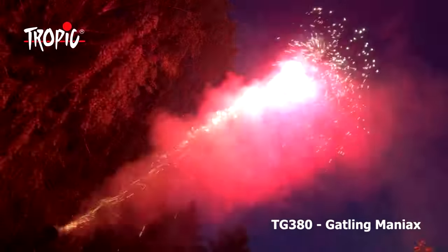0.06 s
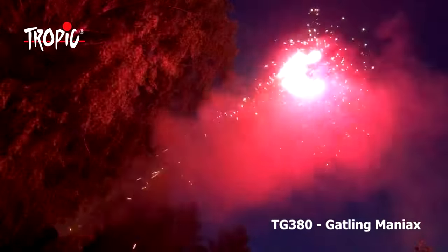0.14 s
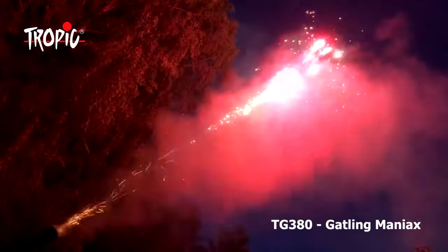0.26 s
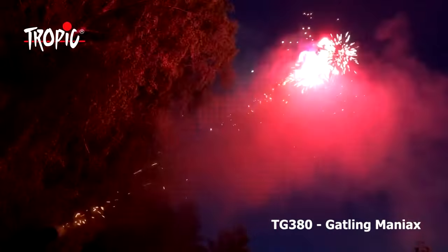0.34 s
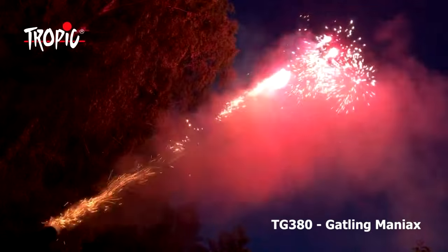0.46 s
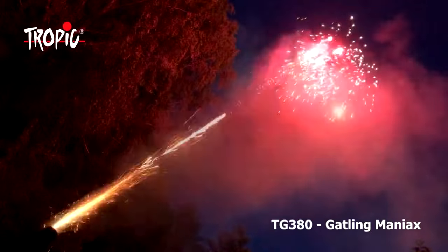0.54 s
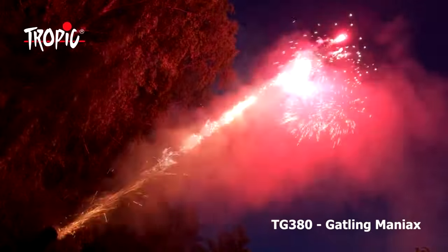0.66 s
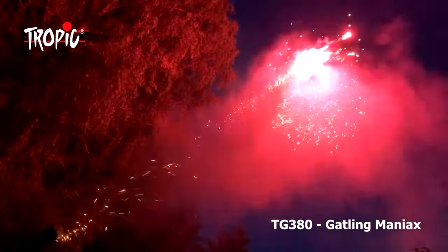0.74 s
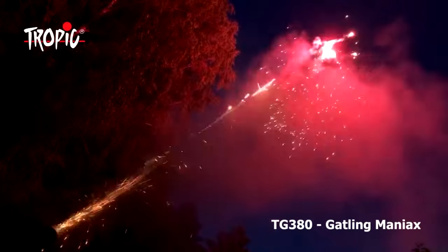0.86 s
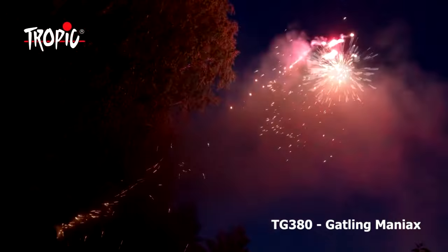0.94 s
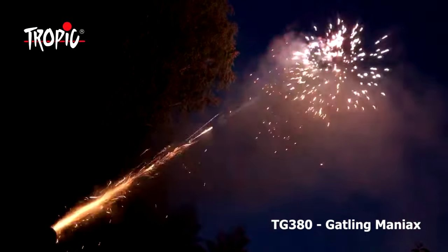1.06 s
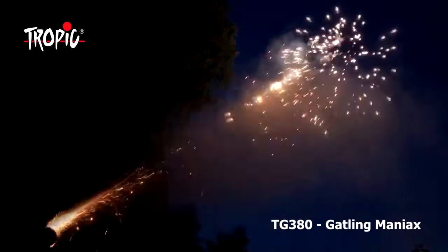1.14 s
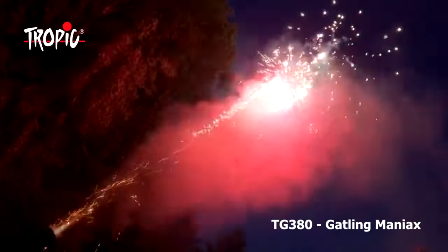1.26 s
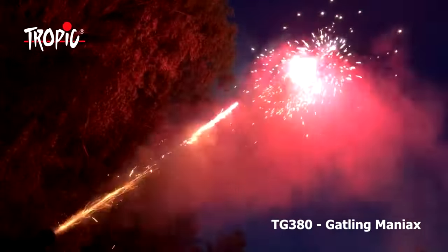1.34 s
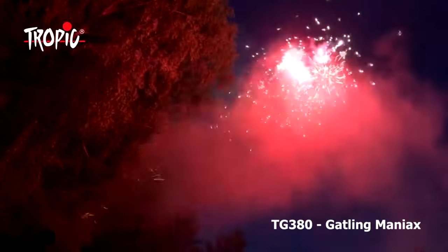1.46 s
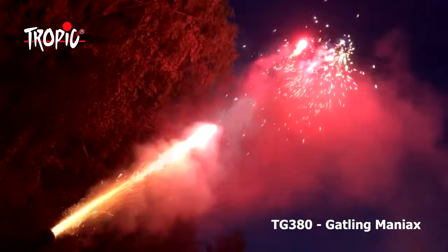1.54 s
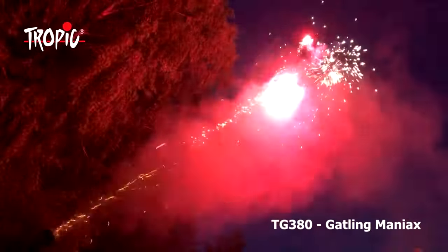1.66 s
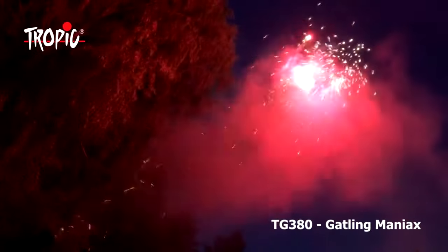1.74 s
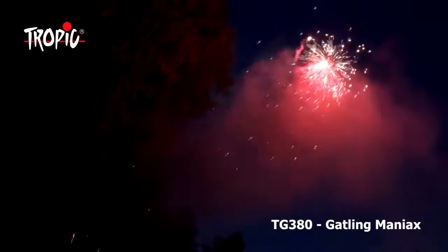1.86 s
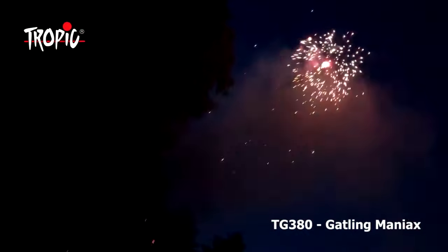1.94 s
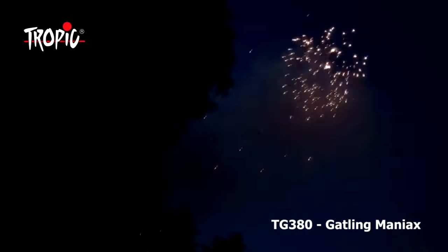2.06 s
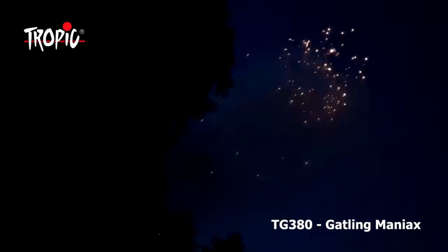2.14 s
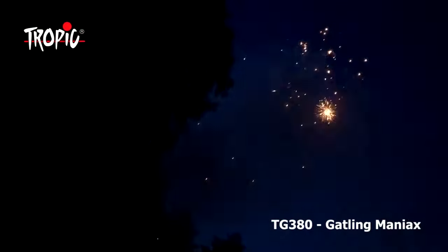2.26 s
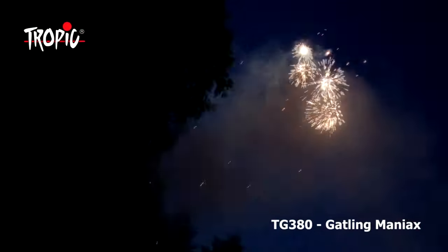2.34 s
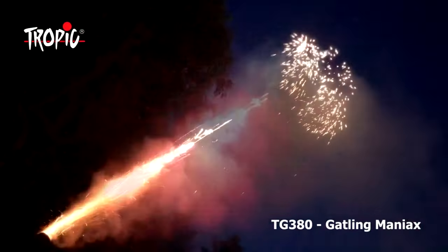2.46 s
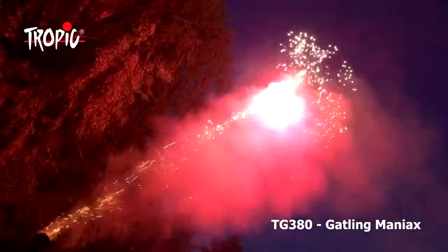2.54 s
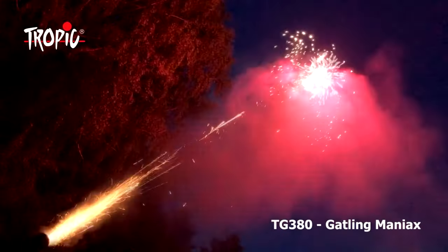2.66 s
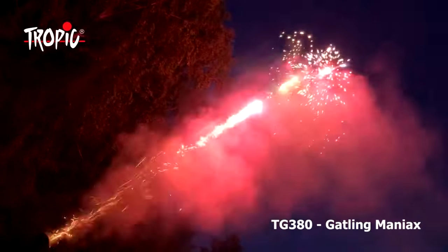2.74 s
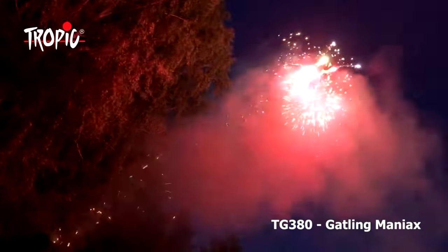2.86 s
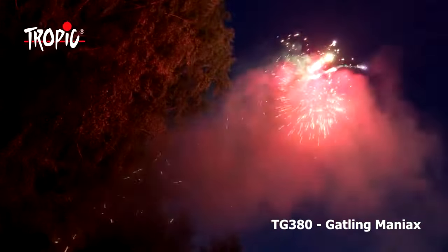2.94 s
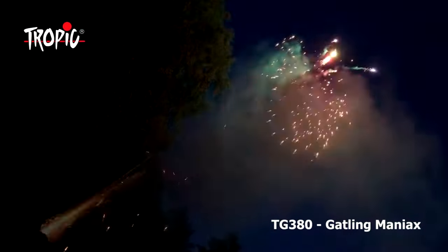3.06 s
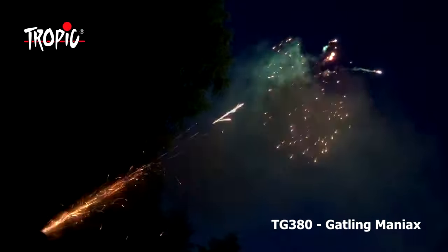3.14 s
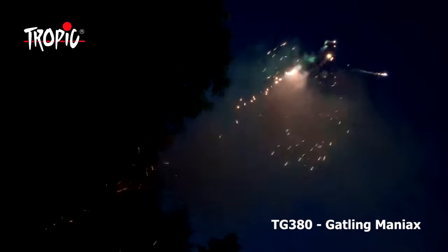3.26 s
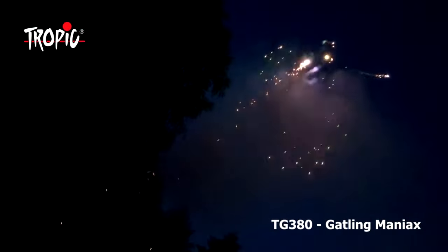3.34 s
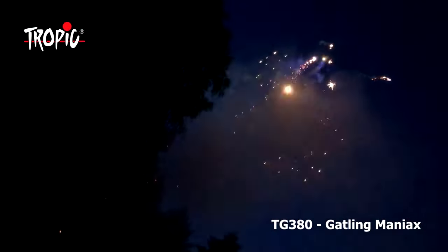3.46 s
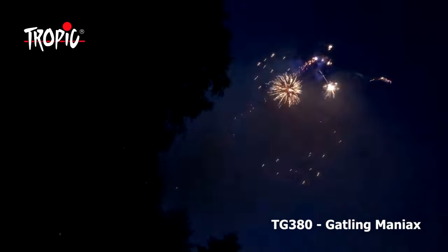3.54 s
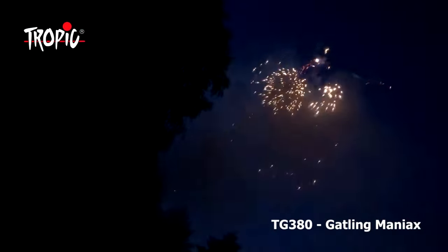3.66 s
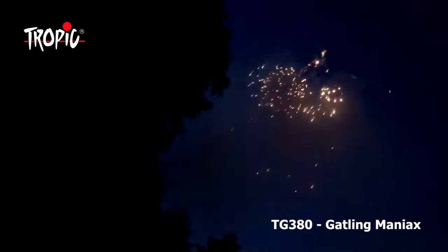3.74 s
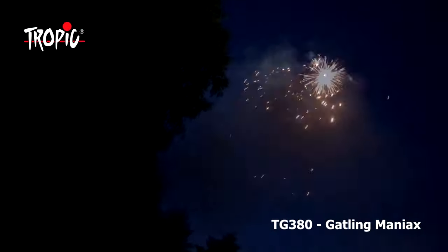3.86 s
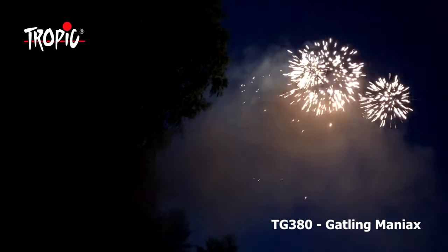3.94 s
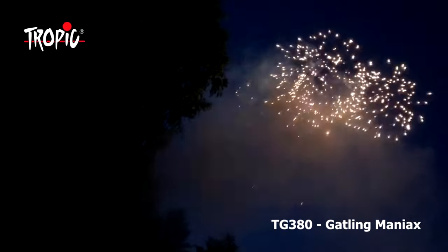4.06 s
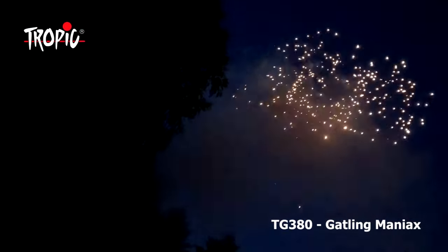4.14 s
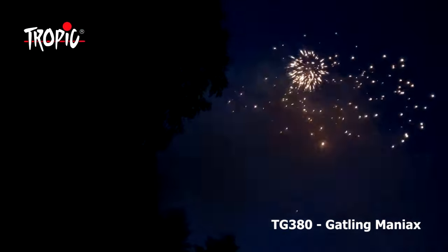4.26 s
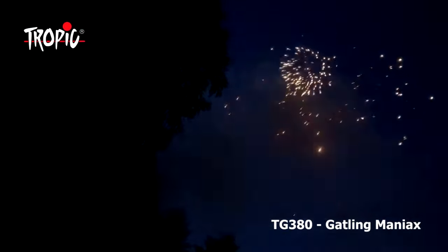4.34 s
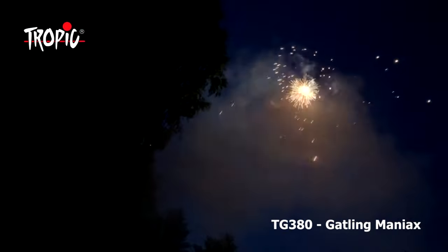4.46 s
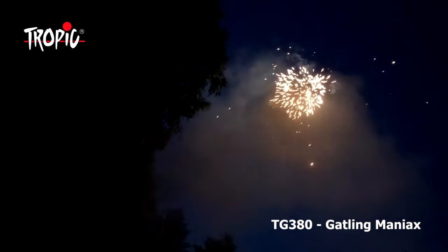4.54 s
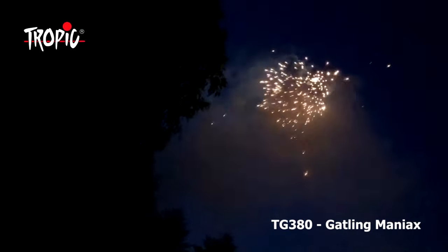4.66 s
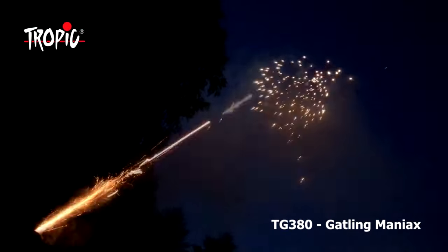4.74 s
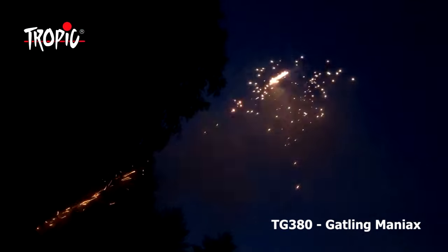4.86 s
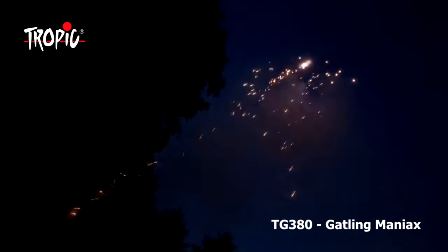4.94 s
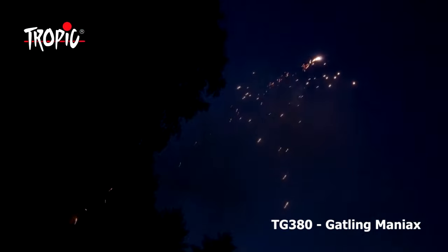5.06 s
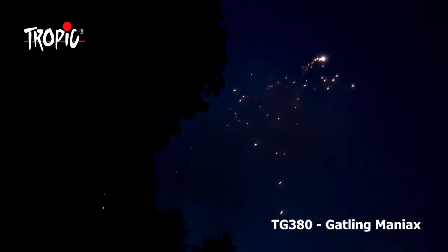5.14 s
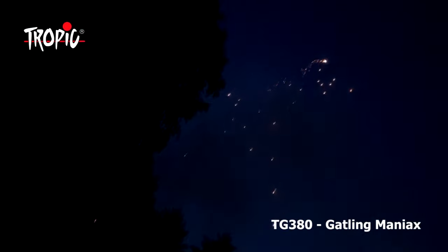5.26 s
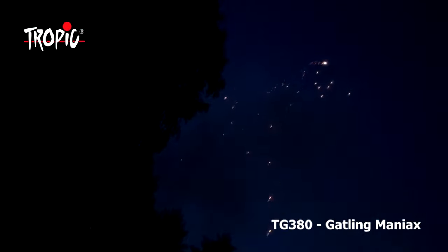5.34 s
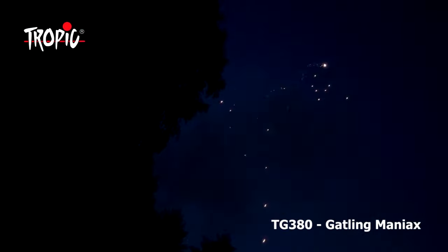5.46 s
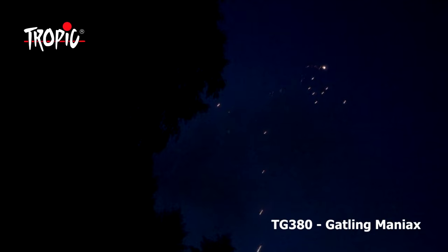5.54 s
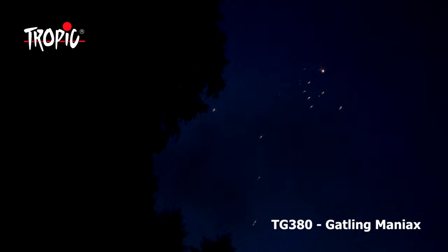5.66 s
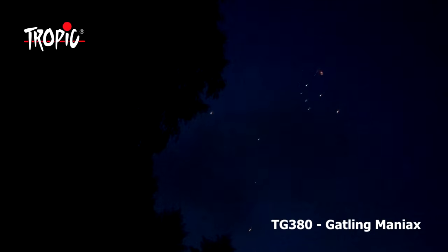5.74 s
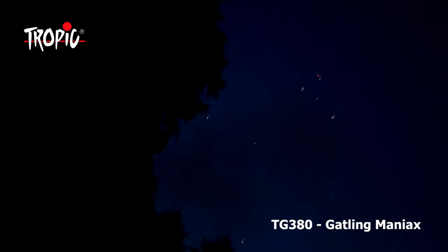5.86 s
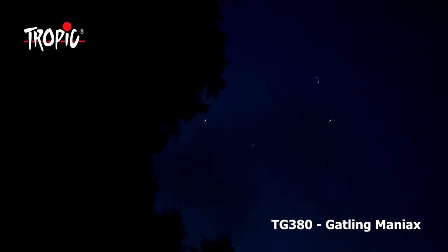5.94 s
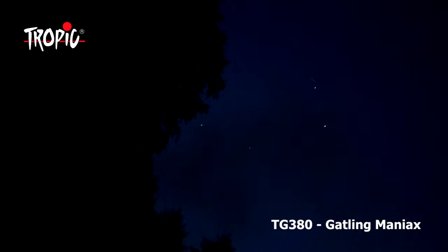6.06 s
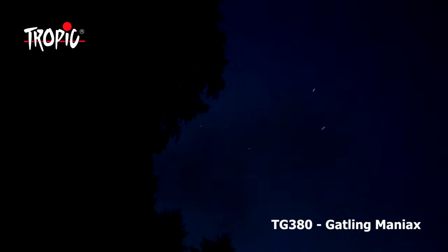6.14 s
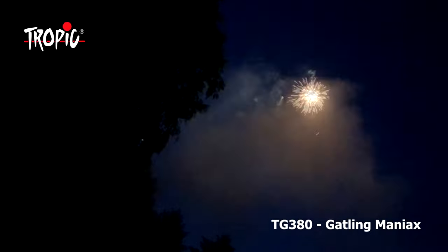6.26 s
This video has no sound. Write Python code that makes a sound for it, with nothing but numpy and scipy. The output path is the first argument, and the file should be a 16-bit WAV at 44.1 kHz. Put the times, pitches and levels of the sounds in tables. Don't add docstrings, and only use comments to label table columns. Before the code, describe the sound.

Rapid gunlike firework launches, each a soft low puff with gas hiss and a hard muzzle crack, overlap with bright, dry bursts overhead and small crackling sparks. The open outdoor space answers with patchy hissing echoes and dull clicks off distant walls. Activity comes in clusters, dwindles to isolated bangs, then a low faraway roll and quiet air before one late pop. Peaks are hard-limited and slightly rounded.

```python
import sys
import numpy as np
from scipy import signal
from scipy.fft import rfft, irfft, next_fast_len
from scipy.io import wavfile
from scipy.ndimage import uniform_filter1d

SR = 44100
rng = np.random.default_rng(int(sys.argv[2]) if len(sys.argv) > 2 else 0)


def to_linear_factor(level_db):
    exponent = np.asarray(level_db, float) / 20
    return 10 ** exponent


def unload_wav(signal):
    wavfile.write(
        sys.argv[1],
        SR,
        np.round(np.clip(np.atleast_2d(signal).T, -1, 1) * 32767).astype(np.int16),
    )


N = 278270
TIME = np.arange(N) / SR
SIZE = next_fast_len(N + SR // 4)
HZ = np.arange(SIZE // 2 + 1) * SR / SIZE + 1e-3
BANDS_HZ = 45 * 2 ** np.arange(-1 / 3, 8.6, 1 / 3)
SPARK_WIDTH_MS = 0.088


def colour(points, hz, column=1):
    points = np.array(points, float)
    return np.interp(np.log(hz), np.log(points[:, 0]), points[:, column])


def add(out, s, shape, before, after):
    i = np.arange(max(int((s - before) * SR), 0), min(int((s + after) * SR), N))
    out[i] += shape(i / SR - s)


def fade(times, power, t60, rise):
    kicks = np.zeros(N)
    np.add.at(kicks, (np.asarray(times) * SR).astype(int), power)
    up = np.exp(-1 / (rise * SR))
    down = np.exp(-2 * np.log(1000) / (t60 * SR))
    return signal.lfilter([1 - up], np.convolve([1, -up], [1, -down]), kicks)


def walk(rate):
    k = int(SR / rate)
    held = np.repeat(rng.standard_normal(N // k + 1), k)
    return 0.87 * uniform_filter1d(held, k)[:N]


def blast(t, width, suction, stretch):
    front = 1 / (1 + np.exp(-np.clip((t + width / 2) / (0.11 * width), -40, 40)))
    late = np.maximum(t, 0)
    push = (1 + suction) * np.exp(-late / (0.29 * width))
    pull = suction * np.exp(-late / (stretch * width))
    return -front * (push - pull)


def shock(out, s, db, width, ground_lag, ground_db):
    add(out, s, lambda t: to_linear_factor(db) * blast(t, width, 0.28, 12.0), .002, .012)
    add(out, s, lambda t: -to_linear_factor(db - 13) * np.exp(-(t / (.17 * width)) ** 2), .0002, .0002)
    add(out, s + .00034, lambda t: -to_linear_factor(db - 10) * blast(t, 1.2 * width, .1, 3.0), .002, .012)
    add(out, s + ground_lag, lambda t: to_linear_factor(db + ground_db) * blast(t, 3.7 * width, 0.43, 5.7), .002, .012)


def through_air(x, db):
    loss_db = db * (HZ / 13000.0) ** 2
    shadow_db = -7.5 * np.exp(-((HZ - 2660) / 280) ** 2)
    bass_cut = HZ / (HZ - 1j * 60)
    return irfft(rfft(x, SIZE) * to_linear_factor(loss_db + shadow_db) * bass_cut, SIZE)[:N]


# (pitch_hz, level_db per Hz)
NIGHT_AIR = [(24, -23), (40, 11.5), (137, 0.5), (163, 1.5), (337, -4), (372, -18.5), (422, -12.5),
             (1760, -17), (2700, -26.5), (6170, -34), (16000, -41.5)]


def night_air():
    swell_db = 2.5 * np.exp(-((TIME - 5.35) / 0.16) ** 2)
    for hz in BANDS_HZ:
        yield to_linear_factor(2 * (colour(NIGHT_AIR, hz) - 39 + 2.0 * walk(4) + swell_db * (hz < 400)))


# (pitch_hz, burst_level_db, burst_t60_s, launch_level_db, launch_t60_s)
NEAR_ECHO = [(50, -8.5, .5, 10.5, .4), (130, -5.5, 0.72, 8, 0.77), (238, -1, 0.7, 1.5, 0.96),
             (480, -7, 0.66, -21.5, .5), (1070, -4.5, 0.63, -19, 0.51), (1620, -2, 0.76, -20.5, .5),
             (2900, -6.5, 0.74, -10, 0.45), (4440, -5, 0.57, -7, 0.48), (6500, -9, .54, -4, 0.35),
             (9800, -16, .42, -8, .44), (15000, -23, .34, -5.5, 0.14)]
# (pitch_hz, level_db per Hz)
FAR_ECHO = [(45, -9.5), (160, -6.5), (340, -13.5), (450, -20.5), (1800, -16), (3500, -20), (7000, -26.5),
            (15000, -41.5)]


def echoes():
    star_s, _, star_echo_db, star_ms = np.transpose(STARS)
    spark_s, spark_db = np.transpose(SPARKS)
    muzzle_s, _, muzzle_echo_db, _ = np.transpose(MUZZLES)
    all_s = np.r_[0, star_s, spark_s, muzzle_s]
    burst_power = to_linear_factor(2 * np.r_[-31, star_echo_db, spark_db - 38.5])
    muzzle_power = to_linear_factor(2 * muzzle_echo_db)
    doublings = np.r_[0, np.log2(8 * star_ms), np.log2(8 * SPARK_WIDTH_MS) + 0 * spark_s]
    leaves, twigs, grains = walk(60), walk(500), np.maximum(walk(800) - 1, 0)
    patches_db = -0.17 * leaves - 0.26 * twigs + 5.5 * grains
    for hz in BANDS_HZ:
        dull = to_linear_factor(2 * -6.5 * hz / 1e4 * doublings)
        far_t60 = 3.1 * (300 / hz) ** 0.24
        far = fade(all_s, np.r_[burst_power, muzzle_power], far_t60, .081)
        overhead_power = np.r_[burst_power * dull, muzzle_power * to_linear_factor(-16.)]
        overhead = fade(all_s, overhead_power, colour(NEAR_ECHO, hz, column=2), 0.002)
        near = fade(muzzle_s, muzzle_power, colour(NEAR_ECHO, hz, column=4), 0.0016)
        echo = overhead * to_linear_factor(2 * (colour(NEAR_ECHO, hz) + 9.0))
        echo += near * to_linear_factor(2 * (colour(NEAR_ECHO, hz, column=3) + 8.5))
        echo += far * to_linear_factor(2 * colour(FAR_ECHO, hz))
        yield echo * to_linear_factor(2 * (patches_db + .8 * walk(25) + 2.2 * walk(150)))


# (pitch_hz, level_db per Hz)
GAS_COLOUR = [(300, 6), (1000, -4), (2000, 7.5), (3000, -6), (6500, -3.5), (10000, -8), (15000, -9)]


def gas_jet():
    puff_s, _, gas_db = np.transpose(PUFFS)
    gas = fade(puff_s - .0015, to_linear_factor(2 * gas_db), .09, .0011)
    spit = fade(puff_s - .0068, to_linear_factor(2 * (gas_db - 13.0)), 0.026, 0.00092)
    for s, *_ in MUZZLES:
        gas *= np.where((TIME > s + .0015) & (TIME < s + .0105), to_linear_factor(-14.), 1)
    for hz in BANDS_HZ:
        jet = gas + spit * to_linear_factor(2 * -8 * hz / 9000.0)
        yield jet * to_linear_factor(2 * (colour(GAS_COLOUR, hz) + 9 + 4.4 * walk(900)))


# (start_s, puff_level_db, gas_level_db)
PUFFS = np.array([(.0873, 0, -18), (.2731, -3.5, -5.5), (.4189, -6.5, -16.5), (.5031, -6.5, -14.5),
         (.7064, -4.5, -17.5), (.9222, -4.5, -19), (1.0623, -6, -18), (1.2017, -5, -16.5),
         (1.4102, -6, -24), (1.4405, -23, -15), (2.3053, 0.5, -16), (2.3262, -12, -15.5), (2.542, -8, -17),
         (2.5774, -11, -15), (2.9867, -3, -19), (4.619, -9.5, -19)])


def puffs():
    out = np.zeros(N)
    for s, db, _ in PUFFS:
        add(out, s, lambda t: to_linear_factor(db) * blast(t, 0.0028, 1.0, 5.0), .006, .04)
        add(out, s - .006, lambda t: to_linear_factor(db - 15.5) * blast(t, 0.0027, 0.27, 2.2), .005, .02)
    return out


def jet_cracks():
    out = np.zeros(N)
    for (s, puff_db, gas_db), luck in zip(PUFFS, rng.random((len(PUFFS), 2))):
        db = -5.5 + 0.81 * puff_db + .6 * (gas_db + 10.5)
        second_s = s + 2.9 * (0.33 + luck[0]) / 1000
        shock(out, s, db, .000061, .0001, -15.5)
        shock(out, second_s, db - 5.5 + 4 * luck[1], .000061, .0001, -15.5)
    return out


# (start_s, width_ms, echo_level_db, swing_level_db)
MUZZLES = [(0.0946, 0.15, -24, -10), (0.2787, .16, -19, -6.5), (0.4259, 0.34, -34.5, -13.5),
           (0.5104, 0.32, -23, -14.5), (0.7129, 0.25, -30, -9), (0.9299, 0.2, -35, -13),
           (1.0684, 0.32, -26.5, -9), (1.2079, 0.3, -27, -19.5), (1.4207, 0.27, -26.5, -9.5),
           (1.4432, 0.32, -27, -13), (2.3131, 0.29, -29, -19.5), (2.3359, 0.27, -22, -10),
           (2.549, 0.23, -28, -13), (2.5885, 0.24, -30, -15), (2.996, 0.19, -31, -15),
           (4.6272, 0.24, -31.5, -14)]


def muzzle_shocks():
    out = np.zeros(N)

    def swing(t):
        return np.sin(2 * np.pi * 92 * t + .9) * np.exp(-t / .005) * (1 - np.exp(-t / .0004))

    for s, ms, _, swing_db in MUZZLES:
        db = -1 - 8 * np.log2(5 * ms)
        shock(out, s, db, 0.89 * ms / 1000, 0.00036, -10.5)
        add(out, s, lambda t: to_linear_factor(db - 19.0) * blast(t, 0.00021, 0.082, 3.0), .004, .02)
        add(out, s, lambda t: 2.0 * to_linear_factor(swing_db) * swing(np.maximum(t, 0)), 0, .05)
    return out


# (pitch_hz, level_db per Hz)
LEAD_IN = [(500, -24), (2000, -0.5), (3000, -14.5), (4500, -30.5), (15000, -46)]


def lead_in():
    burst_s, peak_db = np.r_[np.array(STARS)[:, :2], np.array(SPARKS)].T
    ahead = fade(TIME[-1] - burst_s, to_linear_factor(2 * (peak_db - 25.5)), 0.035, .0003)[::-1]
    for hz in BANDS_HZ:
        yield ahead * to_linear_factor(2 * colour(LEAD_IN, hz))


def burst_shock(shocks, rings, s, db, ms):
    shock(shocks, s, db + .5, 0.64 * ms / 1000, .00122, -14.5)
    add(rings, s, lambda t: to_linear_factor(db - 35) * np.exp(t / .005) * np.sin(2 * np.pi * 3080 * t), .03, 0)


# (start_s, peak_db, echo_level_db, width_ms)
STARS = [(0.268, -2, -36, 0.088), (0.2998, -7, -32.5, 0.077), (0.3554, -3, -26.5, 0.096),
         (0.3653, 4.2, -31.5, 0.096), (0.5617, 2.8, -31, 0.12), (0.5857, 0.9, -25, .11),
         (0.8993, 1.9, -23.5, 0.087), (1.1658, 1.1, -26.5, 0.13), (1.2577, 1.5, -23.5, 0.12),
         (1.4812, -3.5, -24.5, 0.16), (1.572, -1, -26.5, 0.077), (1.605, -2.8, -34.5, 0.092),
         (1.8166, -.1, -26, 0.12), (2.2575, -2.5, -30.5, 0.12), (2.2656, 2.7, -29, 0.13),
         (2.2871, -2.2, -34, 0.099), (2.6416, -0.2, -25, 0.12), (2.7713, 1, -23.5, .13),
         (3.5062, 0, -37, 0.085), (3.5326, 3.5, -27, .18), (3.8509, 1, -23, .11),
         (3.9061, -2.5, -35, 0.071), (3.9166, -2.5, -26, 0.24), (4.2222, -0.4, -29, 0.18),
         (4.4526, 2, -28, 0.18), (6.2514, 1.3, -29.5, 0.12)]


def star_bursts():
    shocks, rings = np.zeros((2, N))
    for s, db, _, ms in STARS:
        burst_shock(shocks, rings, s, db, ms)
    return through_air(shocks, -5.5) + rings


# (start_s, peak_db)
SPARKS = [(0.2871, 0), (.3219, 0.5), (0.3255, -11), (0.3581, -9), (1.4319, 2.1), (1.5, -20.5),
          (1.5324, -6.5), (2.192, -28), (3.224, -22), (3.4369, -12), (3.4434, -16.5), (3.4469, -16),
          (3.4782, -1.5), (3.8277, -32), (4.0298, -10)]


def spark_crackle():
    shocks, rings = np.zeros((2, N))
    for s, db in SPARKS:
        burst_shock(shocks, rings, s, db, SPARK_WIDTH_MS)
    return through_air(shocks, -10) + rings


# (start_s, peak_db)
WALL_CLICKS = [(0.4812, -20), (1.3835, -19), (1.472, -10), (1.5901, -16), (2.0925, -36), (2.1251, -35),
               (2.1659, -40), (2.1777, -39), (2.757, -20), (3.1167, -33), (3.1443, -32), (3.1597, -33),
               (3.1812, -33), (3.6489, -24), (3.8392, -33), (3.8675, -14), (4.2106, -33), (5.1559, -50),
               (5.288, -50), (5.5765, -52), (6.0294, -52), (6.2283, -48), (6.3084, -27)]


def wall_clicks():
    out = np.zeros(N)
    for s, db in WALL_CLICKS:
        shock(out, s, db + 2.5, .0001, 0.00078, -11)
    return through_air(out, -10)


def hiss():
    white = rfft(rng.standard_normal(SIZE))
    out = np.zeros(N)
    for hz, *powers in zip(BANDS_HZ, night_air(), echoes(), gas_jet(), lead_in()):
        octaves = np.log2(HZ / hz)
        window = np.cos(np.pi * np.clip(1.5 * octaves, -.5, .5)) ** 2
        out += irfft(white * window, SIZE)[:N] * np.sqrt(sum(powers))
    return out


def limiter():
    bites = [(s, 7.5 + 0.37 * (echo_db + 29) + 0.24 * db - 10.5 * np.log2(8 * ms))
             for s, db, echo_db, ms in STARS]
    bites += [(s, 7 + .6 * db) for s, db in SPARKS]
    bites += [(s, 10 + 0.13 * (echo_db + 26)) for s, _, echo_db, _ in MUZZLES]
    duck_db = np.zeros(N)
    for s, db in bites:
        t = TIME - s
        shape = np.clip((t - .0008) / .002, 0, 1) * np.exp(-np.maximum(t - .0098, 0) / .0012)
        duck_db = np.maximum(duck_db, db * shape)
    return to_linear_factor(-duck_db)


def scene():
    launches = puffs() + jet_cracks() + muzzle_shocks()
    bursts = star_bursts() + spark_crackle() + wall_clicks()
    return (launches + bursts + hiss() * limiter())[None]


def roll_off(x):
    return signal.sosfilt(signal.butter(12, 17150, fs=SR, output="sos"), x)


# (pitch_hz, level_db)
MICROPHONE = [(25, -42.5), (45, -16), (80, -12), (300, -3.5), (1700, 0), (2900, 0.5), (4500, 2), (7000, 2),
              (10000, 2), (15000, 2)]


def record(dry):
    late = np.exp(-1j * np.pi * 1.2 * np.log((400 + HZ ** 2) / (1500 ** 2 + HZ ** 2)))
    wet = irfft(rfft(dry, SIZE) * to_linear_factor(colour(MICROPHONE, HZ)) * late, SIZE)
    wet = wet / (1 + (wet / .86) ** 6) ** (1 / 6)
    top = 1 / np.sqrt(1 + (HZ / 15800) ** 160)
    mix = irfft(rfft(wet) * top, SIZE)[:, :N]
    return roll_off(mix)


dry = scene()
out = record(dry)
unload_wav(out)
```